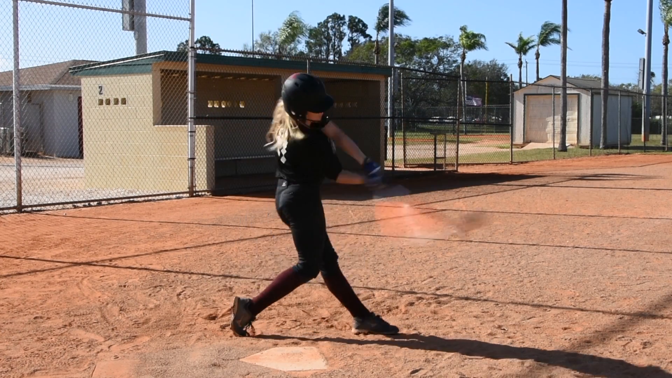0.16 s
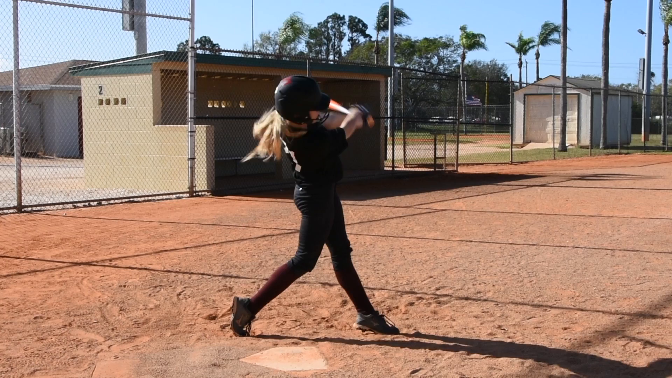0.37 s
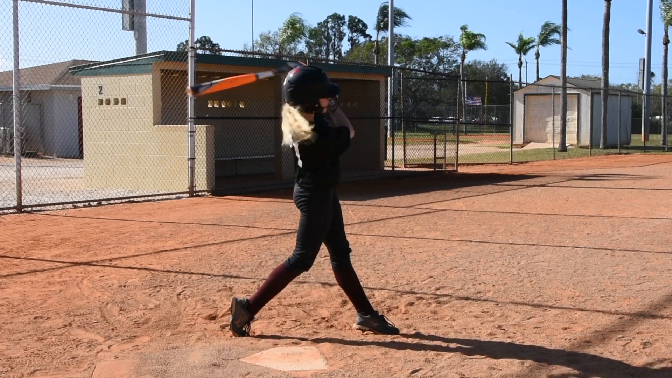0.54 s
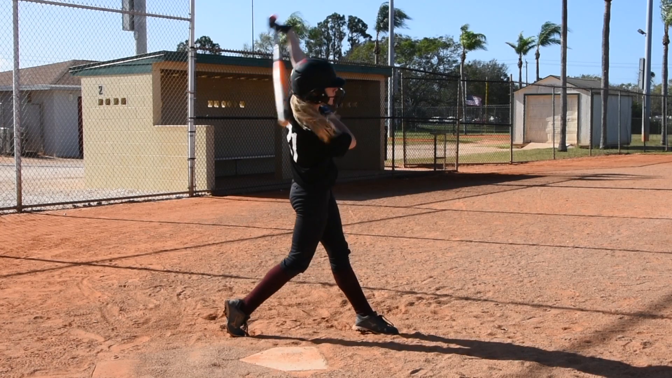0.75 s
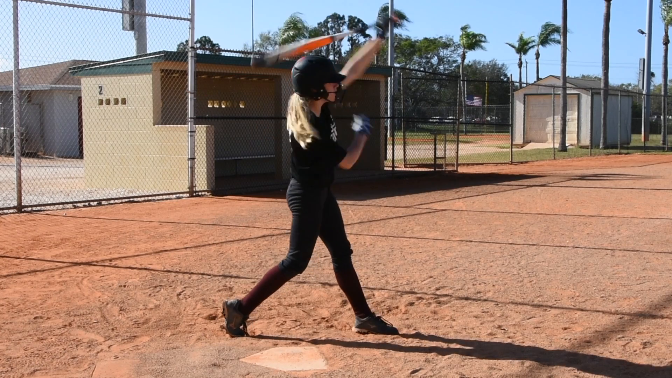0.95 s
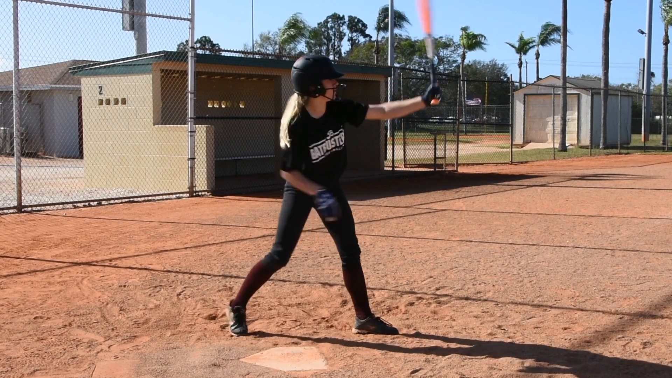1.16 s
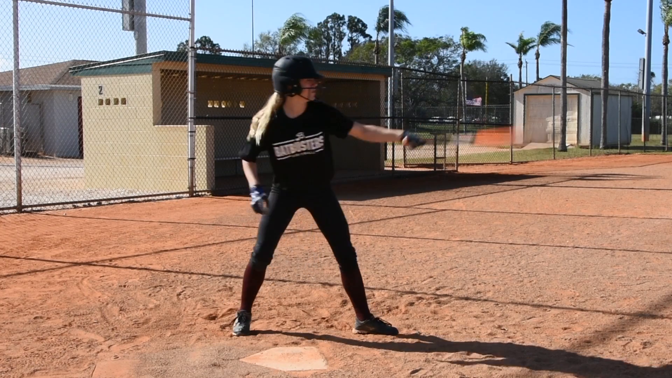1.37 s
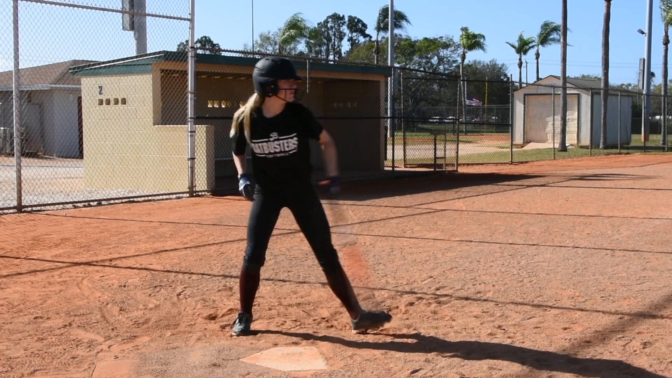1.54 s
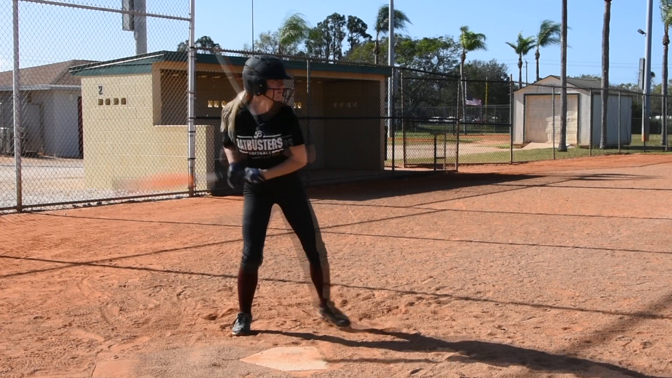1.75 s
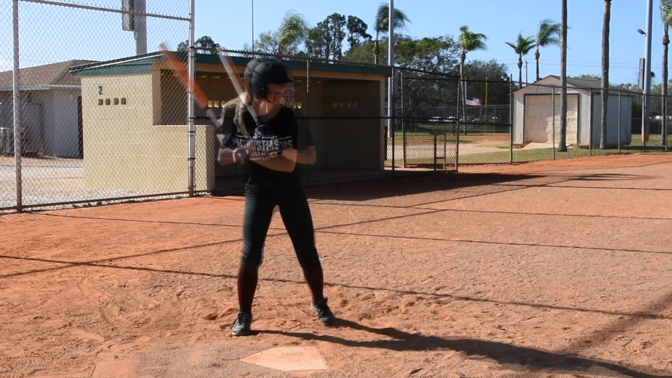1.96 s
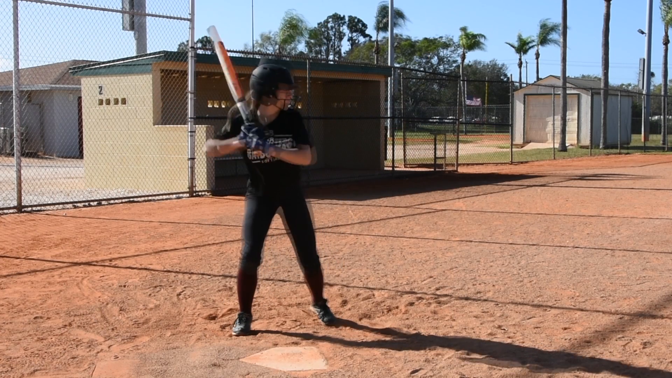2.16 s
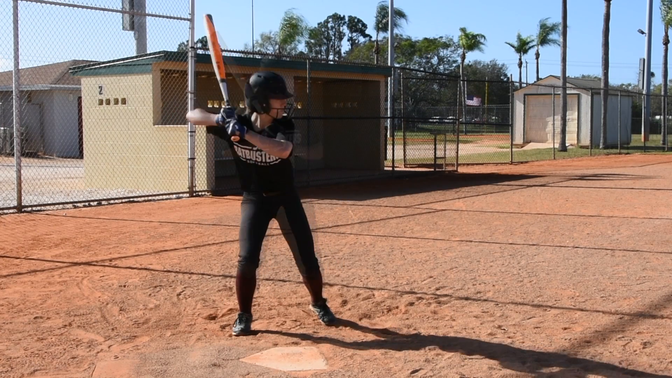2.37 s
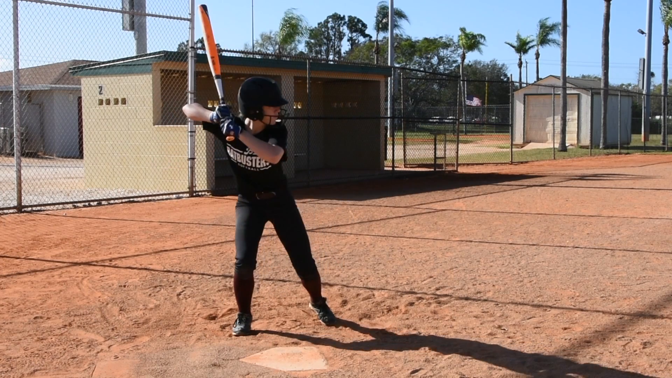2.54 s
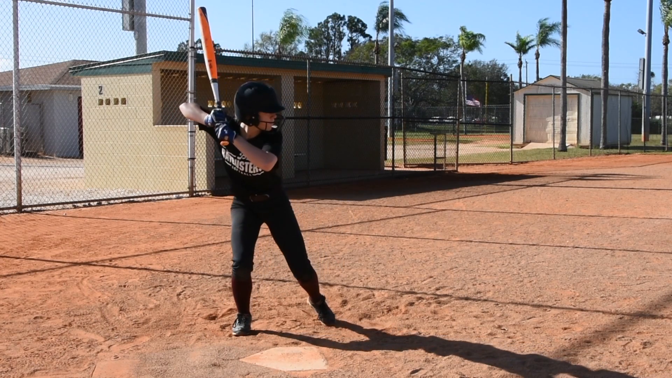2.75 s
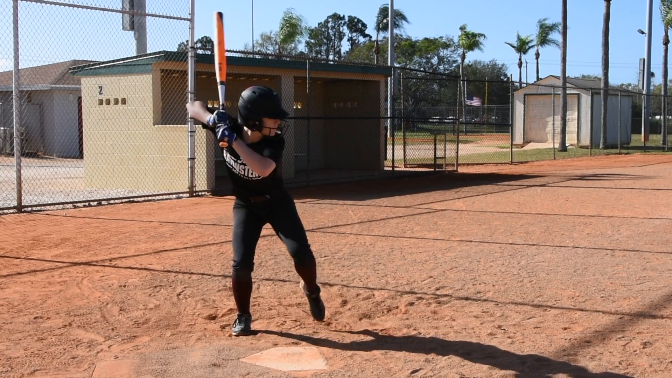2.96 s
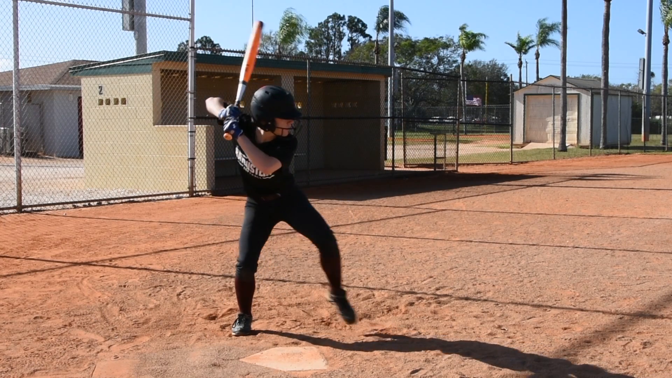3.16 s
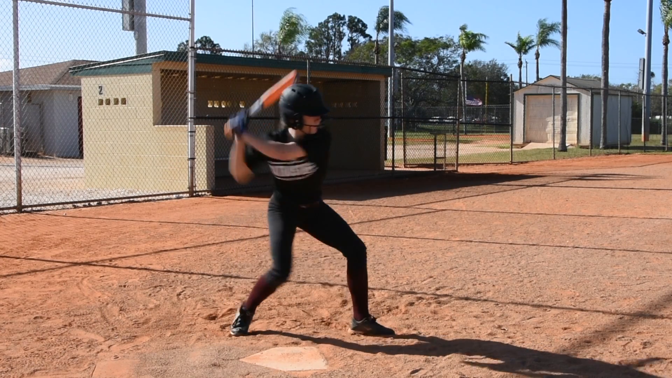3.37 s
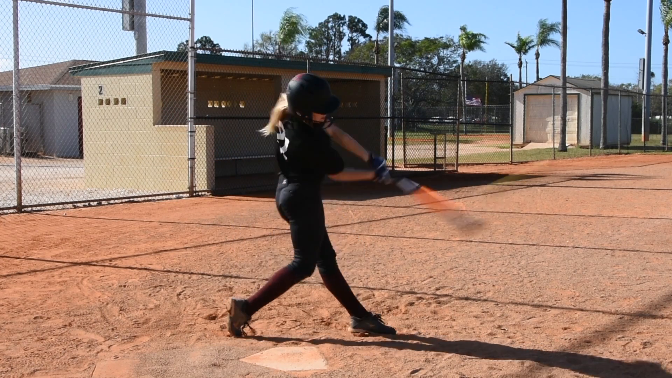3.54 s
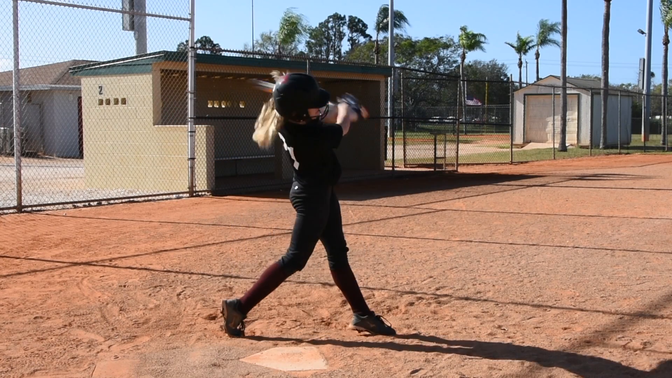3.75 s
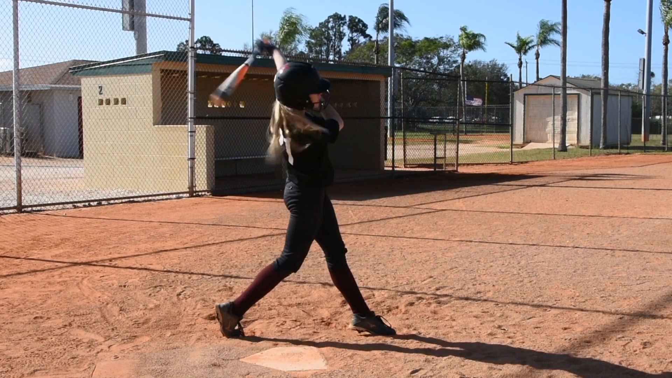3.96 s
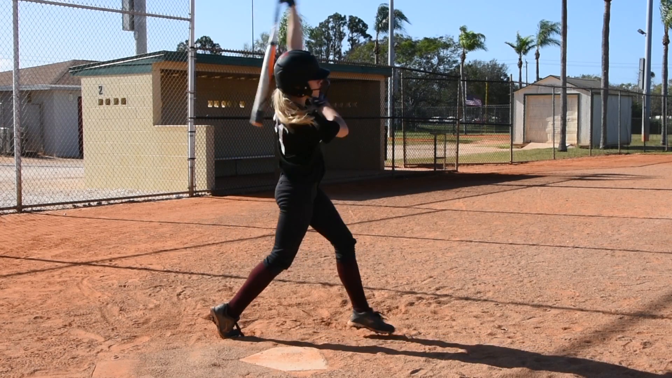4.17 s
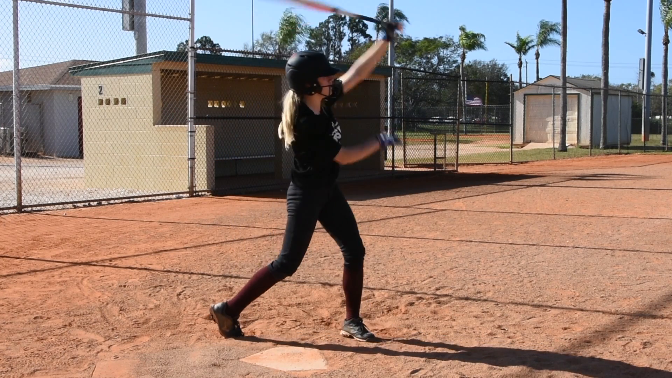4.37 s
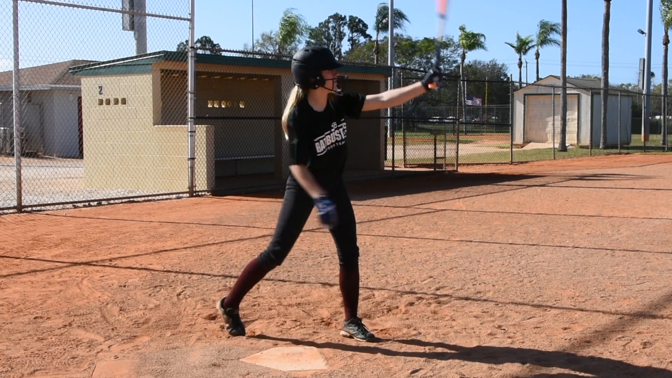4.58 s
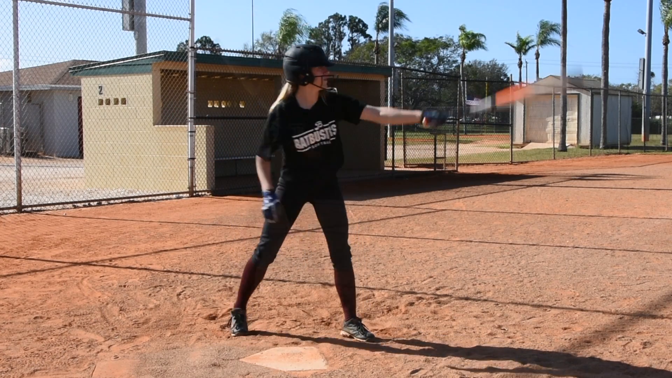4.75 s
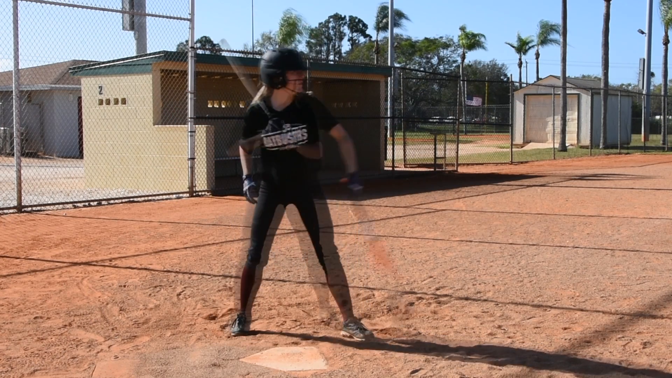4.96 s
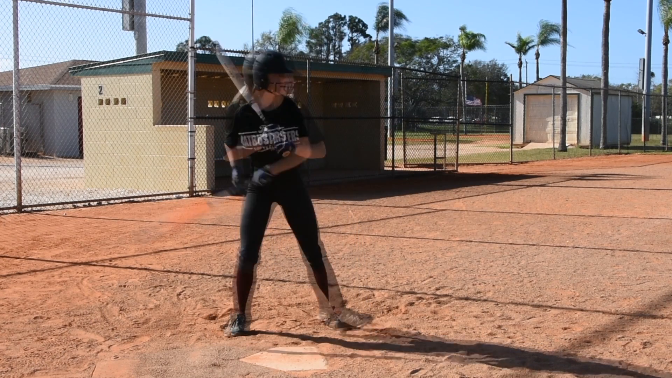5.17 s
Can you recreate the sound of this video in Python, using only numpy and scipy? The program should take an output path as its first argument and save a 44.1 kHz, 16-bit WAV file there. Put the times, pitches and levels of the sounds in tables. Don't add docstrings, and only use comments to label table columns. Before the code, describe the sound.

A bat smacks a ball twice, sharp and ringing, echoing off nearby structures while far engines drone and air hisses faintly.

```python
import sys
import numpy as np
from scipy import signal
from scipy.fft import rfft, irfft
from scipy.io import wavfile
from scipy.ndimage import uniform_filter1d

SR = 44100
rng = np.random.default_rng(int(sys.argv[2]) if len(sys.argv) > 2 else 0)


def dump(signal):
    limited = np.clip(np.atleast_2d(signal).T, -1, 1)
    pcm = np.round(limited * 32767).astype(np.int16)
    wavfile.write(sys.argv[1], SR, pcm)


def volts(x):
    e = np.asarray(x, float) / 20
    return 10 ** e


N = 230017


def in_time(rows):
    s, *columns = np.transpose(rows)
    return [np.interp(np.arange(N) / SR, s, column) for column in columns]


def at_hz(points, hz):
    table_hz, values = np.transpose(points)
    return np.interp(np.log(hz), np.log(table_hz), values)


def drift(rate_hz):
    hop = 40
    r = np.exp(-2 * np.pi * rate_hz * hop / SR)
    white = rng.standard_normal(N // hop + 2002)
    slow = signal.lfilter([1], [1, -2 * r, r * r], white)[2000:]
    return np.interp(np.arange(N) / hop, np.arange(len(slow)), slow / slow.std())


def band(x, low_hz, high_hz):
    sos = signal.butter(2, [low_hz, min(high_hz, SR / 2.2)], "band", fs=SR, output="sos")
    return signal.sosfilt(sos, x)


# f/Hz, likeness [0-1]
CAPSULE_LIKENESS = [(1500, 0.99), (3100, 0.92), (6800, 0.29), (15000, 0.41)]


def spread(mid, side, hz):
    alike = np.clip(at_hz(CAPSULE_LIKENESS, hz), 0, 1)
    return np.sqrt(1 + alike) * mid + np.sqrt(1 - alike) * side * [[1], [-1]]


def modes(t, table):
    out = 0
    for k, (hz, t60_s, db) in enumerate(table):
        out = out + (-1) ** k * volts(db - 60 * t / t60_s) * np.sin(2 * np.pi * hz * t)
    return out


# t/s, crack level/dB, thump level/dB, ground bounce level/dB
BLOWS = [
    (0.27332, 10.5, -2, -6.5),
    (3.63188, 10.5, -2, -11),
]
# after t/s, loss [dB/s], most loss [dB]
HAND_GRIP = [
    (.046, 900, 20),
    (.019, 700, 40),
]
# f/Hz, t60 [s], first blow level/dB, second blow level/dB, share sent to the field [dB]
BARREL_MODES = [(1329.3, 0.39, -6, -16.5, -19), (1681, 0.069, -2.5, -9, -25), (2424, 0.14, -14, -22, -2),
                (1881, 0.04, -9, -10, -16), (1109, 0.016, -2.5, -1, -1.5), (1500, 0.0048, 2, 4.5, -1),
                (3400, 0.0019, -14.5, -21.5, 18), (4700, 0.0028, -24, -19.5, -6.5),
                (5610, 0.024, -19, -32.5, -10), (5920, 0.07, -35, -36.5, -4)]
# f/Hz, t60 [s], level/dB
BALL_MODES = [
    (216, 0.07, -23),
    (435, 0.011, -23.5),
    (667, 0.011, 3.5),
    (878, 0.027, -6.5),
]


def bat(number):
    _, crack_db, thump_db, ground_db = BLOWS[number]
    free_s, grip_db_per_s, most_db = HAND_GRIP[number]
    t = np.arange(SR // 3) / SR
    thump = volts(thump_db) * modes(t, BALL_MODES)
    held = volts(-np.clip(grip_db_per_s * (t - free_s), 0, most_db))

    snap = volts(crack_db - 8.5) * np.exp(-t / 0.00011) * np.cos(2 * np.pi * 8000 * t)
    near_ring = [(row[0], row[1], row[2 + number]) for row in BARREL_MODES]
    near = snap + thump + held * modes(t, near_ring)

    crack = volts(crack_db) * np.exp(-t / 0.00007) * np.cos(2 * np.pi * 4000 * t)
    swing_shift = 1.035
    sent_ring = [(row[0] * swing_shift, row[1], row[2 + number] + row[4]) for row in BARREL_MODES]
    sent = crack + volts(-4.5) * thump + held * modes(t, sent_ring)

    lag = round(0.004916 * SR)
    bounce = band(near, 550, 2600) + 0.1 * near
    near[lag:] += volts(ground_db) * bounce[:-lag]
    return np.array([near, sent])


# t/s after the blow, level/dB, low f/Hz, high f/Hz, smear [ms]
ECHOES_LEFT = [(.1283, -6, 3000, 5600, 1.1), (.1289, -16, 800, 2640, 4.3), (.156, -27, 1000, 4500, 7.5),
               (0.2023, -30, 1300, 9000, 3.5), (.331, -42, 6000, 11100, 1)]
ECHOES_AHEAD = [(.0283, -12, 1000, 3000, 1.7), (.0706, -16, 800, 2800, .9), (.1, -13, 6630, 15900, .6),
                (.1002, -11.5, 1000, 3800, 1.5), (.1008, -13, 300, 850, 2), (.2765, -32, 1900, 6770, 4.3)]
ECHOES_RIGHT = [(.0705, -20, 5500, 14330, .8), (.114, -23, 1500, 7000, 4.6), (.173, -34, 900, 3500, 6.2),
                (.3, -40, 2500, 6500, 3)]
ECHO_SIDES_DB = (3, 1.1, -3.5)
# delay [ms], level/dB, rise [dB/ms], fall [dB/ms]
SCATTER = [
    (4, -31, 7.5, 3),
    (33, -38, 0.64, 1),
    (131, -53, 1.2, 0.3),
]
# f/Hz, extra loss [dB/s]
SCATTER_LOSS = [(300, 19), (1300, 19.5), (2600, -14), (5000, 3), (9000, 30), (16000, 78.5)]


def field():
    t = np.arange(int(0.7 * SR)) / SR
    out = np.zeros((2, len(t)))
    for rows, pan_db in zip((ECHOES_LEFT, ECHOES_AHEAD, ECHOES_RIGHT), ECHO_SIDES_DB):
        for delay, db, low_hz, high_hz, smear_ms in rows:
            smear = np.exp(-np.abs(t - delay) * 1000 / smear_ms) * (t > delay)
            facets = rng.standard_normal(len(t)) * smear
            facets[round(delay * SR)] = 5.0
            facets /= np.sqrt(np.sum(facets ** 2))
            sides = volts(db + pan_db * np.array([[0.5], [-0.5]]))
            out += sides * band(facets, low_hz, high_hz)

    power = 0
    for ms, db, rise, fall in SCATTER:
        away_db = np.maximum(rise * (ms - 1000 * t), fall * (1000 * t - ms))
        power = power + volts(db - away_db) ** 2
    tail = np.minimum(t / 0.05, 1) ** 2 * volts(-48.5 - 60 * t / 0.73)
    level = np.sqrt(power + tail ** 2)

    edges = 250 * 2 ** np.arange(0, 6.6, 0.5)
    white = rng.standard_normal((2, 2, len(t)))
    for k, (low, high) in enumerate(zip(edges, edges[1:])):
        hz = np.sqrt(low * high)
        loss = volts(-at_hz(SCATTER_LOSS, hz) * t)
        out += level * loss * spread(*band(white[k % 2], low, high), 0.46 * hz)
    return out


def blows():
    near, sent = np.zeros((2, N))
    for number, row in enumerate(BLOWS):
        direct, outward = bat(number)
        at = round(row[0] * SR)
        near[at:at + len(direct)] = direct
        sent[at:at + len(outward)] = outward
    return near + signal.fftconvolve(sent[None], field(), axes=1)[:, :N]


# t/s, level/dB, centre f/Hz, length [ms]
SCUFFS = [(.0, -47, 730, 110), (0.038, -43, 2340, 18), (.1, -49, 1900, 120), (0.05, -37.5, 1500, 23),
          (.085, -39, 1610, 13), (.166, -33, 1820, 18), (.178, -33.5, 1920, 16.6), (.225, -25, 1820, 3.3),
          (0.262, -28.5, 1593, 5.1), (1.089, -28, 1800, 2.5), (1.189, -24.5, 1680, 4),
          (1.196, -26, 1780, 4.4), (1.1955, -30, 1020, 4.9), (1.524, -42.5, 1749, 12),
          (1.543, -46.5, 2080, 20), (1.665, -49.5, 1700, 46), (1.693, -48, 1690, 17),
          (3.355, -44, 1880, 25), (3.392, -46.5, 1300, 60), (3.37, -48, 800, 80), (3.435, -39.5, 1890, 20),
          (3.488, -40, 1820, 13), (3.532, -44, 1899, 12), (3.558, -47, 1700, 21), (4.195, -48, 1500, 6.9),
          (4.378, -51, 1710, 37), (4.885, -42, 1400, 6.9), (5.019, -46, 1700, 6.2), (5.10, -42, 1500, 5.7),
          (5.193, -47.5, 2620, 15)]


def shoes():
    out, t = np.zeros(N), np.arange(SR // 10) / SR
    for s, db, hz, ms in SCUFFS:
        white = rng.standard_normal(len(t))
        crunch = band(band(white, hz / 1.62, hz * 1.32), hz / 1.54, hz * 1.23)
        grit = crunch + 0.017 * band(white, 2500, 11000)
        shape = np.minimum(t / 0.0067, 1) * np.exp(-(t * 1000 / max(ms, 2)) ** 2)
        at = round(s * SR)
        out[at:at + len(t)] += (volts(db) * shape * grit / grit.std())[:N - at]
    return out


LENS_TICKS = [.397, .897, 1.396, 1.896, 2.348, 2.849, 3.349, 3.384, 4.352, 4.855]
# f/Hz, level/dB
TICK_TONES = [(7500, -74.5), (10000, -69), (12500, -81)]


def lens_motor():
    t, tick_s, edge_s = np.arange(N) / SR, 0.029, 0.002
    gate = sum(np.clip(np.minimum(t - s, s + tick_s - t) / edge_s, 0, 1) for s in LENS_TICKS)
    return gate * sum(volts(db) * np.sin(2 * np.pi * hz * t) for hz, db in TICK_TONES)


# start t/s, length [s], f/Hz, glide [Hz], level/dB
WHISTLES = [(1.93, .13, 3825, -5, -65), (2.08, .11, 3810, 10, -64), (2.26, .09, 4160, 30, -66),
            (2.77, .06, 4160, 30, -66), (2.2, .55, 3815, 10, -71), (1.53, .08, 4120, 10, -67),
            (1.69, .07, 4070, 30, -67), (2.0, .14, 3635, -70, -63), (2.14, .25, 3625, 15, -69),
            (4.09, .17, 810, -170, -54)]


def whistles():
    out, t = 0, np.arange(N) / SR
    edge_s, fade_db_per_s = 0.03, 5
    for s, length, hz, glide_hz, db in WHISTLES:
        gate = np.clip(np.minimum(t - s, s + length - t) / edge_s, 0, 1)
        fade = volts(-fade_db_per_s * np.clip(t - s, 0, length))
        pitch = hz + glide_hz * np.clip((t - s) / length, 0, 1) + 12 * drift(25)
        level = volts(db + 2.2 * drift(18))
        out += gate * fade * level * np.sin(2 * np.pi * np.cumsum(pitch) / SR)
    return out


# t/s, turns f/Hz
CLIMBING_SPEED = [(0, 15.93), (.4, 16.88), (.8, 17.55), (1.2, 18.1), (1.6, 18.92), (2.2, 19.99)]
CRUISING_SPEED = [(1.75, 21.1), (2.35, 21.42), (2.75, 21.54), (3.35, 21.86), (3.6, 21.9), (3.95, 22.16),
                  (4.55, 22.38), (4.77, 22.34), (4.95, 21.19), (5.21, 19.75)]
# t/s, level/dB
CLIMBING_MAIN = [(0, -24.5), (.11, -30), (.25, -25.5), (.66, -25), (.78, -32), (1.0, -26.5), (1.35, -28),
                 (1.87, -31.5), (2.2, -46.5)]
CRUISING_MAIN = [(1.75, -49), (1.88, -34.5), (2.3, -36), (2.42, -43), (2.52, -34), (2.63, -27), (2.98, -24),
                 (3.3, -26), (3.52, -22), (3.75, -27), (4.06, -28), (4.28, -20.5), (4.5, -28), (4.62, -26),
                 (4.85, -27), (5.05, -35), (5.21, -32)]
# multiple of shaft speed, level/dB, from t/s, until t/s
CLIMBING_SWELLS = [(5, -39, .6, 1.82), (6, -38, 1.13, 2.073), (10, -43, 1.35, 1.85),
                   (16, -43.5, 0.032, .85)]
CRUISING_SWELLS = [(5, -34, 3.05, 4.85), (6, -35, 2.3, 5.1), (13, -43, 2.4, 3.5), (14, -43, 2.3, 2.6),
                   (15, -46, 2.15, 2.55), (12, -46, 3.6, 5.2), (14, -49, 3.7, 5.2)]
# multiple of shaft speed, level/dB against their common curve
CLIMBING_WEAK = [(3, -2.5), (4, 1), (7, 1), (9, -16), (11, -19), (12, -12), (13, -22.5), (14, -5.5),
                 (15, -7.5), (17, -8.5), (18, -26.5), (20, -20), (22, -14), (24, -19)]
CRUISING_WEAK = [(3, -1.5), (4, -9.5), (9, 0.5), (10, -2), (11, -12), (16, -7.5), (17, -10), (18, -14),
                 (19, -15), (20, -17.5), (21, -17.5)]


def engine(speed, main, swells, weak, wobble_db):
    t, (main_db,) = np.arange(N) / SR, in_time(main)
    phase = 2 * np.pi * np.cumsum(in_time(speed)[0]) / SR
    out = volts(main_db + 0.3 * drift(8)) * np.sin(8 * phase + 0.1 * drift(4))
    for k, db, start, end in swells:
        hidden = np.clip(np.maximum(start - t, t - end) / 0.3, 0, 1)
        level = volts(db - 12 * hidden + 1.5 * drift(3))
        out += level * np.sin(round(k) * phase + 0.11 * drift(4))
    weak_db = -48.5 + 0.34 * (main_db + 26.5)
    for k, db in weak:
        level = volts(weak_db + db + wobble_db * drift(2.5))
        out += level * np.sin(round(k) * phase + 0.4 * drift(2.5))
    first_s, last_s = main[0][0], main[-1][0]
    heard = np.clip(np.minimum(t - first_s + 0.05, last_s + 0.1 - t) / 0.05, 0, 1)
    return np.sqrt(2) * out * heard, main_db + 20 * np.log10(heard + 1e-6)


# f/Hz, level/dB per Hz
AIR = [(15, -46), (25, -18.5), (53, -8.5), (105, -3.5), (158, -1), (191, -8), (231, -10), (295, -22.5),
       (366, -23), (565, -29.5), (1350, -31.5), (3290, -43), (4090, -44.5), (13100, -60), (16300, -67.5)]
# t/s, level/dB
TRAFFIC = [(0, 2), (.35, 4.5), (.6, -8.5), (1.3, -3), (1.55, -2.5), (2.2, -6.5), (2.4, 5.5), (2.65, -0.5),
           (3.3, 3.5), (4.1, 3.5), (4.5, -2), (5.22, 2)]
FOLLOWS_TRAFFIC = (.1, 1, 0.12)
FOLLOWS_ENGINES = (.1, .1, 0.22)


def background(engines_db, patchy_db):
    edges = 25 * 2 ** np.arange(0, 9.5, 1 / 3)
    settle = SR // 5
    white, together = rng.standard_normal((2, 2, N + settle)), drift(4)
    traffic_db, = in_time(TRAFFIC)
    engines_db = uniform_filter1d(engines_db, size=SR // 4) + 28
    out = 0
    for k, (low, high) in enumerate(zip(edges, edges[1:])):
        hz = np.sqrt(low * high)
        group = int(hz > 180) + int(hz > 550)
        change_db = FOLLOWS_TRAFFIC[group] * traffic_db + FOLLOWS_ENGINES[group] * engines_db
        change_db -= 4 * (90 < hz < 210)
        patches_db = patchy_db * (0.5 * together + drift(7.7))
        gain = volts(at_hz(AIR, hz) + change_db + patches_db)
        out += gain * spread(*band(white[k % 2], low, high)[:, settle:], hz)
    return volts(-11.5) * out


def scene():
    near = blows() + shoes() + lens_motor() + whistles()
    climbing, climbing_db = engine(CLIMBING_SPEED, CLIMBING_MAIN, CLIMBING_SWELLS, CLIMBING_WEAK, wobble_db=3.0)
    cruising, cruising_db = engine(CRUISING_SPEED, CRUISING_MAIN, CRUISING_SWELLS, CRUISING_WEAK, wobble_db=3.0)
    far = background(np.maximum(climbing_db, cruising_db), patchy_db=1.44)
    return near + climbing + cruising + far


def top_cut(x):
    return signal.sosfilt(signal.butter(12, 16460, fs=SR, output="sos"), x)


# f/Hz, level/dB
CAPSULE_LEAN = [(60, 3), (500, 3), (1300, 2), (4400, 2), (15000, 1.3)]


def record(dry):
    lean_db = at_hz(CAPSULE_LEAN, np.maximum(np.fft.rfftfreq(N, 1 / SR), 1))
    tilted = irfft(rfft(dry) * volts(lean_db * np.array([[0.5], [-0.5]])), N)
    low_pass = signal.cheby2(10, 50, 16900, fs=SR, output="sos")
    mix = signal.sosfilt(low_pass, np.clip(tilted, -1, 1))
    return top_cut(np.clip(mix, -1, 1))


dry = scene()
out = record(dry)
dump(out)
```